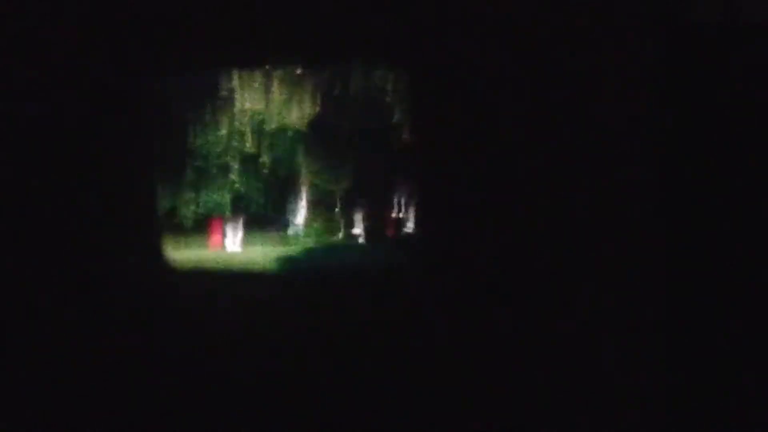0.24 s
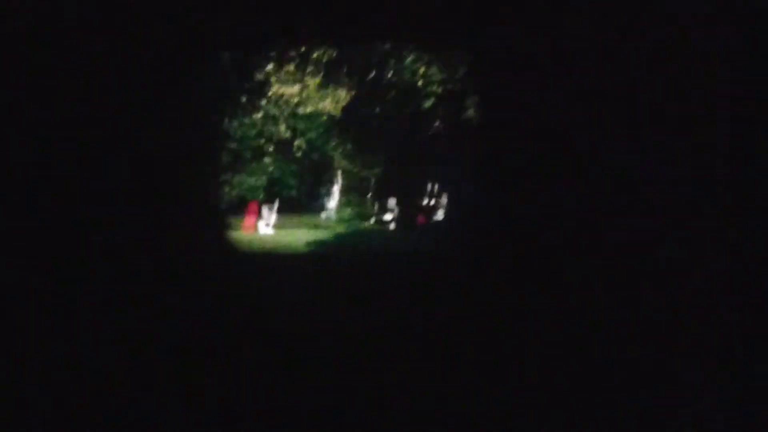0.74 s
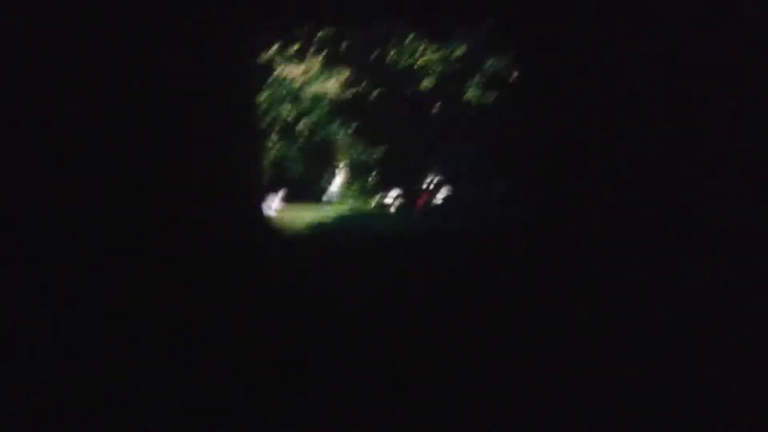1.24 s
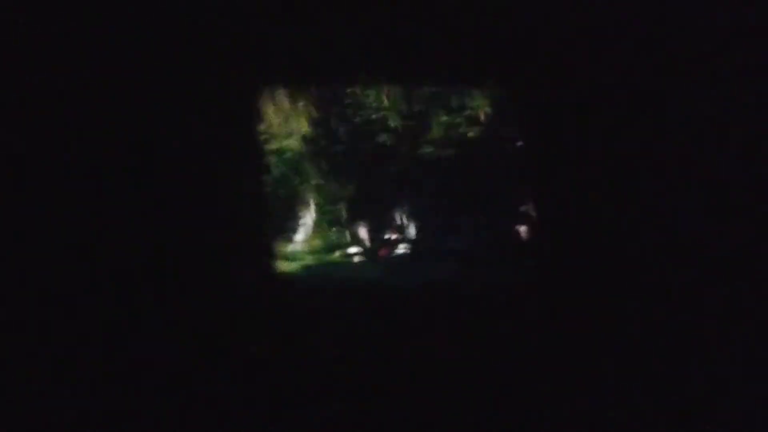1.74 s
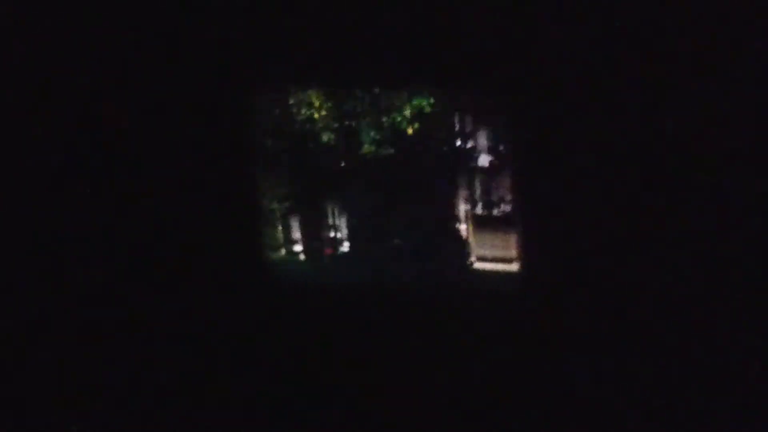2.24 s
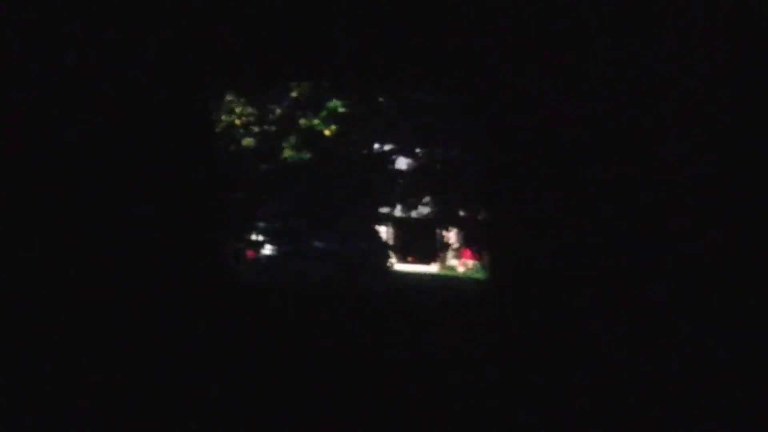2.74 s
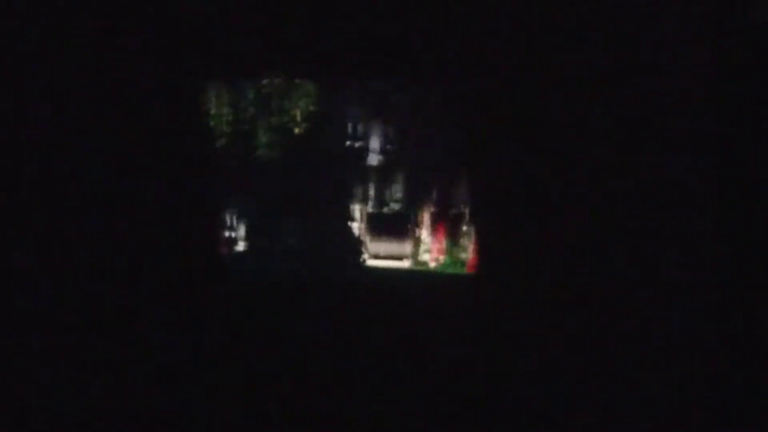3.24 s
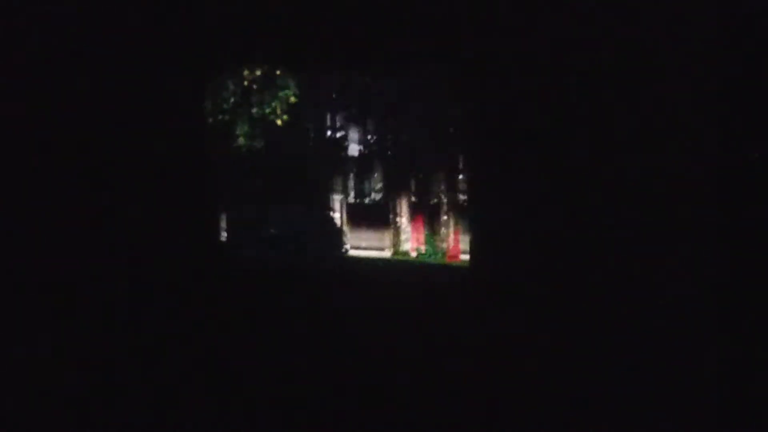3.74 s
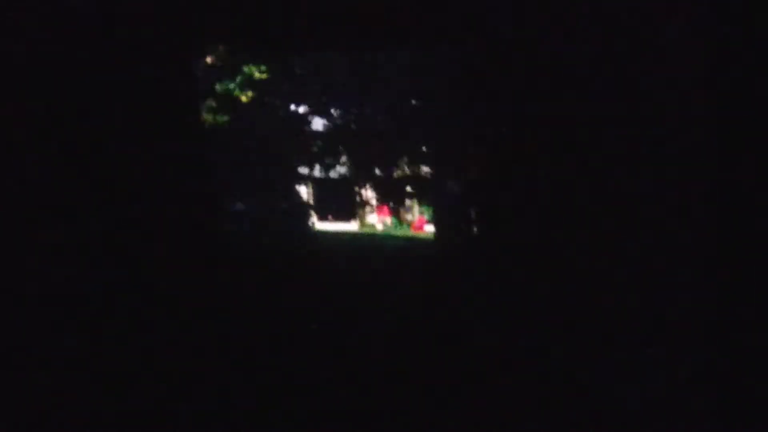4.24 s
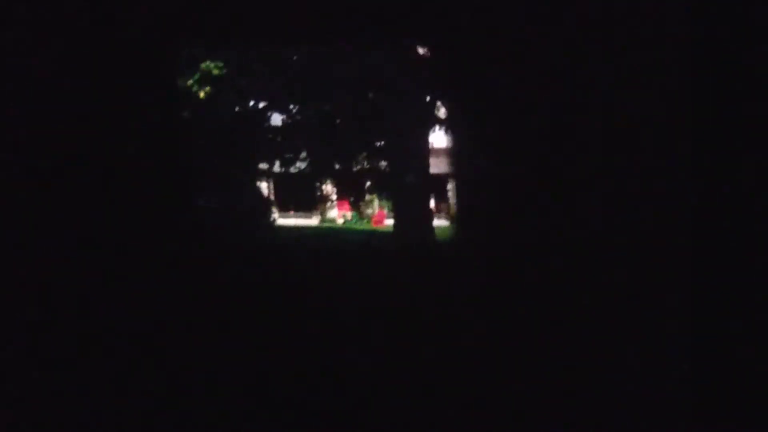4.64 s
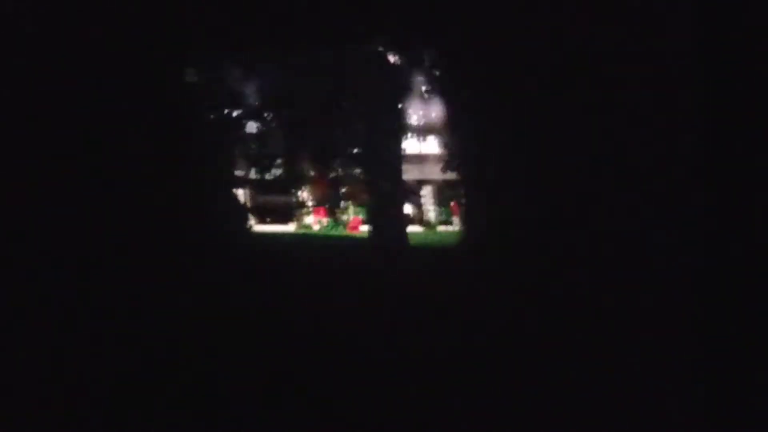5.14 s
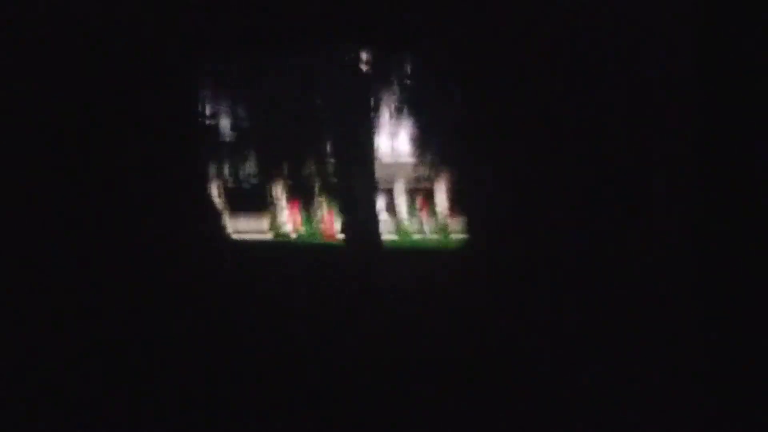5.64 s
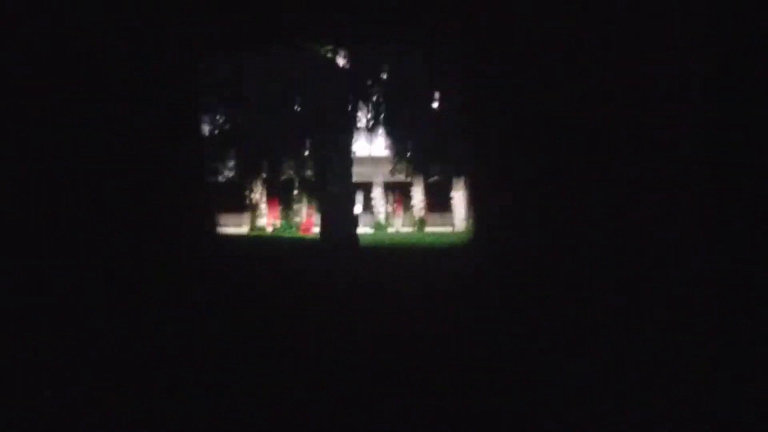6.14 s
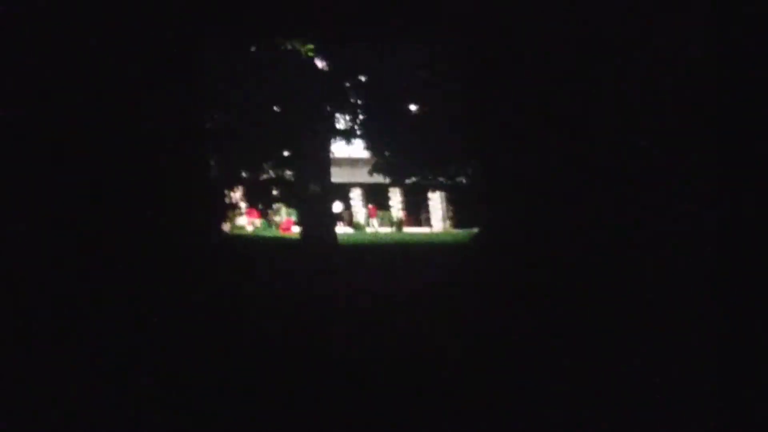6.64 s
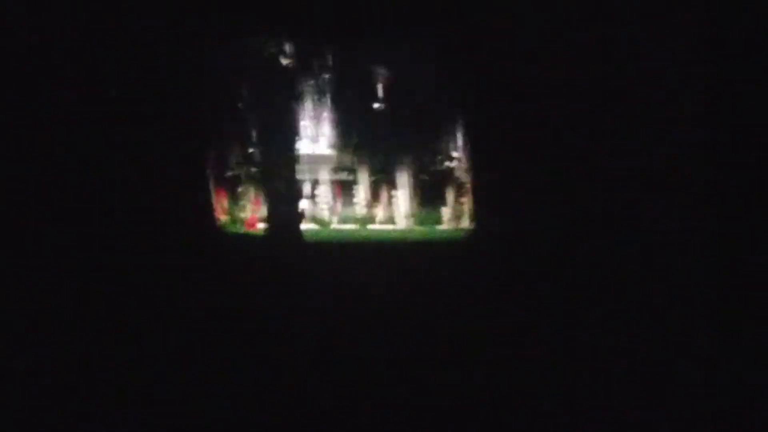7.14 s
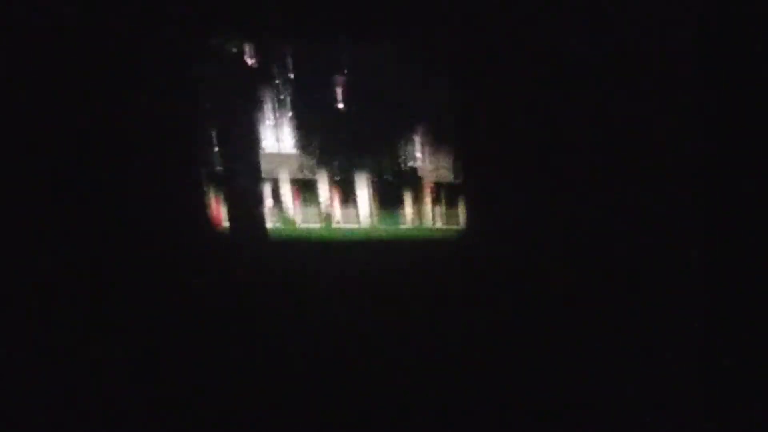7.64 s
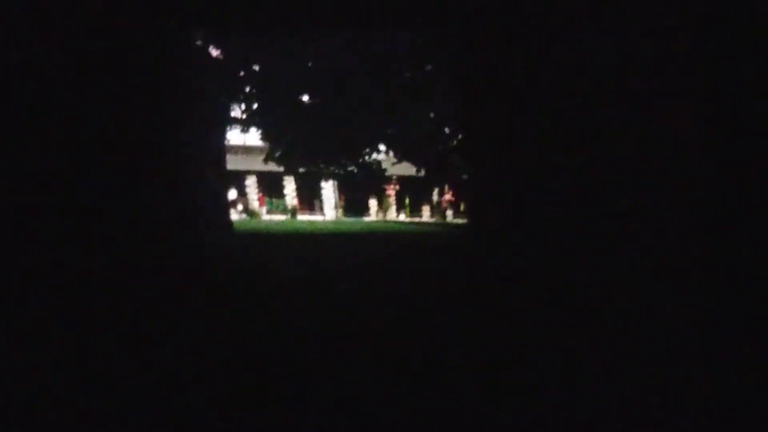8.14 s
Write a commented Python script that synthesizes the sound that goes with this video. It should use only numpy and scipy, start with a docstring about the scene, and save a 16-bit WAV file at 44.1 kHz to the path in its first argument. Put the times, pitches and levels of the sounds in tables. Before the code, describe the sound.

A small film projector runs close by, its fast, even clatter ticking over a motor hum and a thin fan whine.

```python
"""A small film projector runs close by in a small room, at about 15 frames a second. From the start its claw
ticks, strikes and rebounds once a frame, ringing the gate, and a limiter ducks at each strike; the film
hisses, the drive rumbles, the motor hums and the fan whines. At 2 s the right microphone is partly shaded;
at 3.65 s it is covered further, with two soft bumps. After 5 s the motor creeps a little faster,
and at 6 s its whirr swells."""
import sys
import numpy as np
from scipy import signal
from scipy.fft import rfft, irfft
from scipy.io import wavfile
from scipy.ndimage import uniform_filter1d, minimum_filter1d

SR = 44100
rng = np.random.default_rng(int(sys.argv[2]) if len(sys.argv) > 2 else 0)


def generate_wav(sig):
    """Save sig (samples, or channels by samples) to the path in sys.argv[1] as 16-bit PCM at SR."""
    pcm = np.round(np.clip(np.atleast_2d(sig).T, -1, 1) * 32767).astype(np.int16)
    wavfile.write(sys.argv[1], SR, pcm)


N = 370440
TIME = np.arange(N) / SR

# broad spectrum of the clatter: f/Hz, left gain/dB, right gain/dB
CLATTER_SPECTRUM = [(300, -87.5, -95), (1219, -73, -69.5), (1960, -72, -69.5), (2150, -62.5, -57.5),
                    (3670, -64.5, -60), (6070, -62, -56.5), (7630, -59, -51), (8670, -62, -56.5),
                    (9950, -56, -52.5), (11300, -56.5, -56), (11670, -52.5, -57.5), (13940, -51, -51.5),
                    (15510, -57, -57)]


def from_db(db):
    """Amplitude ratio of a level in decibels."""
    return np.exp(np.asarray(db) * (np.log(10) / 20))


def in_time(rows):
    """Linear interpolation of a curve at every sample."""
    return np.interp(TIME, *np.transpose(rows))


def at_hz(points, hz):
    """Interpolation of a spectrum's columns on a log-frequency axis."""
    knots, *columns = np.transpose(points)
    return np.array([np.interp(np.log(hz + 1), np.log(knots), c) for c in columns])


def drift(rate):
    """Random modulation: straight lines join `rate` standard normal values a second."""
    knots = rng.standard_normal(int(rate * N / SR) + 3)
    return np.interp(TIME * rate, np.arange(len(knots)), knots)


def colour(x, db_at, size=4096):
    """Minimum-phase filter of gain db_at(hz), made causal by folding the cepstrum."""
    cepstrum = irfft(np.log(from_db(db_at(np.arange(size // 2 + 1) * SR / size))))
    cepstrum[:, 1:size // 2] *= 2
    cepstrum[:, size // 2 + 1:] = 0
    impulse_response = irfft(np.exp(rfft(cepstrum)))
    return signal.oaconvolve(np.atleast_2d(x), impulse_response, axes=1)[:, :N]


def tone(cycles, left_db, right_db, lag_ms, waver_db):
    """An amplitude-modulated sinusoid; a path difference delays its phase on the right."""
    late = cycles - np.gradient(cycles) * SR * lag_ms / 1000
    level = from_db([[left_db], [right_db]]) * from_db(waver_db * drift(7))
    return np.sqrt(2) * level * np.sin(2 * np.pi * (np.array([cycles, late]) + rng.random()))


def transport():
    """Phase is the integral of speed: returns the running frame count and the mean frame rate."""
    # the motor creeps up to speed: t/s, frame rate/Hz
    frame_rates = [(0, 15.28), (1.1, 15.3545), (5.2, 15.3545), (5.6, 15.4367)]
    speed = in_time(frame_rates)
    first_strike_s = .0144
    return np.cumsum(speed) / SR - first_strike_s * speed[0], speed.mean()


def friction(frame, rate, repeat):
    """Two white noises of 0 dB per Hz; a share is periodic, as the same surfaces meet each frame."""
    fresh = rng.standard_normal((2, N))
    surface = rng.standard_normal((2, SR))[:, (frame % 1 * SR / rate).astype(int)]
    return np.sqrt(SR / 2) * (np.sqrt(repeat) * surface + np.sqrt(1 - repeat) * fresh)


def room(x, first_echo_s=0.011, t60_s=0.13, level_db=-13):
    """Reverberation: a diffuse tail decays exponentially after the nearest surfaces answer."""
    t = TIME[:SR // 2]
    tail = rng.standard_normal((2, len(t))) * from_db(-60 * t / t60_s) * (t > first_echo_s)
    tail /= np.linalg.norm(tail, axis=1, keepdims=True)
    return from_db(level_db) * signal.fftconvolve(x, tail, axes=1)[:, :N]


def reflection(x, share, path_s, sway):
    """Comb filtering: a near surface's echo interferes, shifting as the hand-held microphones sway."""
    delays = [np.round(SR * path_s * (1 + sway * drift(1.3))) / SR for _ in x]
    echo = [np.interp(TIME - delay, TIME, side) for delay, side in zip(delays, x)]
    return (x + share * np.array(echo)) / np.sqrt(1 + share ** 2)


def shade(x):
    """Acoustic shadow: the right microphone loses treble as it is covered in two moves."""
    # covering moves: t/s, duration/s
    moves = [(2.0, 0.61), (3.65, 0.36)]
    # response in the shadow: f/Hz, gain after the first move/dB, gain after the second/dB
    shadow = [(500, 0.5, 0), (1480, -.5, -1.5), (2300, -3.5, -4), (3600, -0.5, -2), (6100, 1, -7),
              (8000, -1.6, -9.5), (11000, -5, -13.5), (15000, -4, -7)]
    left, right = x
    stages = colour(right, lambda hz: at_hz(shadow, hz))
    for (start, duration), dull in zip(moves, stages):
        share = np.clip((TIME - start) / duration, 0, 1)
        right = (1 - share) * right + share * dull
    return np.array([left, right])


def bumps():
    """Damped oscillation: soft, low knocks on the microphone housing."""
    # knocks: t/s, level/dB, f/Hz, decay/s
    knocks = [(3.825, -44, 70, .02), (4.02, -51, 85, .03)]
    out = 0
    for start, level_db, hz, decay in knocks:
        age = np.maximum(TIME - start, 0)
        out = out + from_db(level_db) * np.sin(2 * np.pi * hz * age) * np.exp(-age / decay)
    return out


def mains_hum(mains_hz=60):
    """Even harmonics of the supply: the second hums, the fourth wavers above it."""
    hum = tone(2 * mains_hz * TIME, left_db=-67, right_db=-68, lag_ms=.1, waver_db=.5)
    return hum + tone(4 * mains_hz * TIME, left_db=-56.5, right_db=-60.5, lag_ms=0.13, waver_db=3.5)


def fan(frame, cycles_per_frame=60.55):
    """Rotational tone: geared to the drive, the fan whines at a multiple of the frame rate."""
    # course of the whine: t/s, level/dB
    levels = [(0.25, -47.5), (0.56, -50), (1.03, -45), (6.62, -45.5), (8.25, -45)]
    # whine at the microphones: left gain/dB, right gain/dB, right lag/ms
    pickup = (4.8, 2, 0.13)
    cycles = cycles_per_frame * frame + 0.11 * drift(14)
    return from_db(in_time(levels)) * tone(cycles, *pickup, waver_db=0.5)


def motor(frame, turns_per_frame=4.798, whirr_order=11):
    """Shaft orders: harmonics of the rotation rate, one of which swells as a whirr."""
    # orders of the hum: cycles per turn
    orders = [2, 4, 7, 8, 12, 22]
    # one row per order: left level/dB, right level/dB, right lag/ms
    partials = [(-55.5, -59, .1), (-46, -48, 0.12), (-64, -53.5, 0.16), (-44.5, -44.5, 0.24),
                (-58, -67, 0.47), (-60, -46.5, 0.38)]
    # course of the whirr: t/s, level/dB
    whirr_levels = [(0.15, -53), (1.39, -53), (3.17, -55.5), (6.01, -59), (6.15, -50), (8.25, -51)]
    # whirr at the microphones: left gain/dB, right gain/dB, right lag/ms
    pickup = (13, 8.4, 0.7)
    turns = turns_per_frame * frame + 0.003 * drift(11)
    hum = sum(tone(k * turns, *row, waver_db=1.04) for k, row in zip(orders, partials))
    whirr = from_db(in_time(whirr_levels)) * tone(whirr_order * turns, *pickup, waver_db=2.1)
    return hum + whirr


def gears(frame):
    """Meshing tones: each gear sings at its tooth count times the frame rate, and flutters."""
    # teeth of the gears that turn once a frame
    tooth_counts = [24, 25, 26, 29, 30, 70]
    # one row per gear: left level/dB, right level/dB, right lag/ms
    mesh_tones = [(-63, -78, 0.062), (-54.5, -56.5, 0.2), (-60, -57, 0.12), (-56.5, -54, 0.12),
                  (-51.5, -52, 0.14), (-59.5, -51.5, 0.18)]
    return sum(tone(teeth * frame, *row, waver_db=2.3) for teeth, row in zip(tooth_counts, mesh_tones))


def drive(frame, rate):
    """Spatial coherence: the long waves of the drive's rumble reach both microphones alike."""
    # rumble of gears and cooling air: f/Hz, level in 1 Hz/dB
    rumble = [(15, -102), (42, -91), (75, -83.5), (120, -80.5), (200, -75), (280, -71.5), (450, -68),
              (650, -74), (850, -69.5), (1040, -66), (1230, -76.5), (1400, -73.5), (1520, -68),
              (1900, -71.5), (3000, -88.5)]
    # likeness of left and right: f/Hz, correlation before clipping
    correlation = [(40, 0.96), (130, 1), (350, 0.86), (640, 0.9), (1000, -0.17), (1500, -0.65),
                   (3000, -1.03)]

    def mid_side_db(hz):
        alike = np.clip(at_hz(correlation, hz), -.98, .98)
        return at_hz(rumble, hz) + 10 * np.log10((1 + alike * [[1], [-1]]) / 2)
    mid, side = colour(friction(frame, rate, repeat=0.31), mid_side_db)
    return np.array([mid + side, mid - side])


def film_hiss(frame, rate):
    """Sliding friction: the film hisses through its guides."""
    # hiss spectrum: f/Hz, left and right level in 1 Hz/dB
    spectrum = [(1390, -90, -85.5), (1920, -87.5, -77), (2280, -70, -64), (3200, -72.5, -66),
                (4150, -76, -71), (5400, -74.5, -70), (6600, -73, -70.5), (7740, -70.5, -64.5),
                (10300, -70.5, -73), (13000, -66.5, -71), (15700, -74, -88)]
    return colour(friction(frame, rate, repeat=.25), lambda hz: at_hz(spectrum, hz))


def gate_db(hz):
    """Resonance: the film gate's modes add peaks to the clatter's broad spectrum."""
    # gate modes: f/Hz, width/Hz, left lift/dB, right lift/dB
    modes = [(2420, 170, 4, 12), (2900, 130, 5, 4), (3370, 130, 2, 6), (3720, 120, -3, 6),
             (4080, 140, 1, 5), (4380, 140, 3, 4), (7960, 280, 5, 6), (9500, 260, 3, 6), (11650, 200, 3, 0),
             (12460, 220, 4, 1), (13210, 170, 3, 1.5), (14020, 250, 2.5, 2)]
    lifts = [np.array([[left], [right]]) / (1 + (2 * (hz - centre) / width) ** 2)
             for centre, width, left, right in modes]
    return at_hz(CLATTER_SPECTRUM, hz) + sum(lifts)


def claw(frame, rate, mean_db=0.8, uneven_db=0.7, grain_db=0.8, crossover_hz=4130):
    """Impact noise: each contact is a burst of chatter; hard ones are bright, later ones shake the body."""
    # touch, strike, rebound, settle, return:
    # t after the strike/s, treble gain/dB, body gain/dB, rise/s, decay/s
    contacts = [(-.0039, 10, 14.5, 0.0011, 0.00063), (0, 11.5, 11.5, 0.00012, 0.0025),
                (.0026, 12, 13.5, 0.00077, 0.0016), (.006, -0.5, 8, 0.00012, 0.0035),
                (0.0324, -6, -4, 0.0009, 0.0032)]
    # how hard the claw works: t/s, gain/dB
    force = [(0.0, -0.8), (3.0, -0.9), (3.6, 0.8), (4.8, -1.3), (5.1, 0.8), (5.4, -2), (8.4, -0.3)]
    power = 0
    for delay, treble_db, body_db, rise, decay in contacts:
        age = (frame - delay * rate) % 1 / rate
        burst = (1 - np.exp(-age / rise)) * np.exp(-age / decay)
        power = power + (from_db([[treble_db], [body_db]]) * burst) ** 2
    chatter = friction(frame, rate, repeat=0.16) * from_db(grain_db * drift(2500))
    # a share of the chatter reaches both microphones, the right one later
    shared, lag_s = 0.073, .00032
    late = np.roll(chatter[0], round(lag_s * SR))
    chatter[1] = np.sqrt(1 - shared) * chatter[1] + np.sqrt(shared) * late
    bands = [signal.butter(3, crossover_hz, side, fs=SR, output="sos") for side in ("high", "low")]
    treble, body = (signal.sosfilt(band, chatter * np.sqrt(p)) for band, p in zip(bands, power))
    return (treble + body) * from_db(mean_db + in_time(force) + uneven_db * drift(rate))


def scene():
    """Superposition: the gate rings in the direct field only; the room takes the broad clatter."""
    frame, rate = transport()
    strikes = claw(frame, rate)
    direct = reflection(colour(strikes, gate_db), share=0.35, path_s=.0011, sway=.16)
    reverberant = room(colour(strikes, lambda hz: at_hz(CLATTER_SPECTRUM, hz)))
    diffuse = reflection(reverberant + film_hiss(frame, rate), share=0.46, path_s=.003, sway=.06)
    hum = drive(frame, rate) + gears(frame) + motor(frame) + fan(frame) + mains_hum()
    return shade(direct + diffuse + hum) + bumps()


def limiter(x, threshold_db, slope, release_db_per_s, size=88):
    """Look-ahead compression: both channels are turned down on peaks."""
    power = uniform_filter1d(np.mean(x ** 2, axis=0), size // 2)
    level_db = 10 * np.log10(np.maximum(power, 1e-12))
    cut_db = slope * np.maximum(level_db - threshold_db, 0)
    held_db = np.maximum.accumulate(cut_db + release_db_per_s * TIME) - release_db_per_s * TIME
    return x * from_db(uniform_filter1d(minimum_filter1d(-held_db, size), size // 2))


def record(dry):
    """Band and peak limiting: the deepest bass is removed, strikes are ducked, the top is cut."""
    low_hz, high_hz = 42, 15850
    thinned = signal.sosfilt(signal.butter(2, low_hz, "high", fs=SR, output="sos"), dry)
    limited = limiter(thinned, threshold_db=-12, slope=0.69, release_db_per_s=353)
    return signal.sosfilt(signal.ellip(12, .1, 80, high_hz, fs=SR, output="sos"), limited)


dry = scene()
out = record(dry)
generate_wav(out)
```